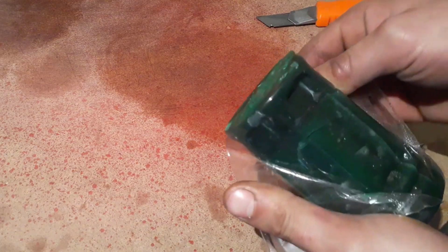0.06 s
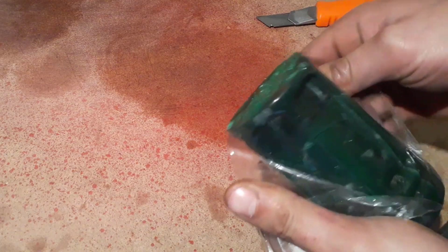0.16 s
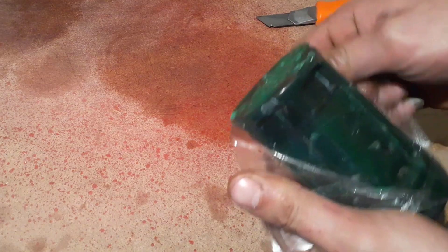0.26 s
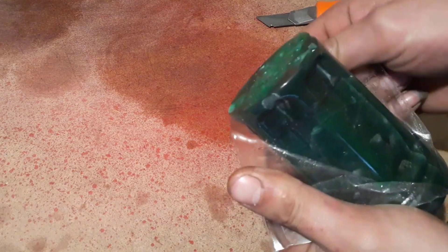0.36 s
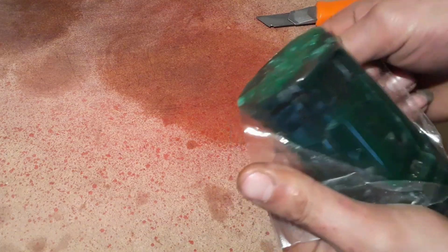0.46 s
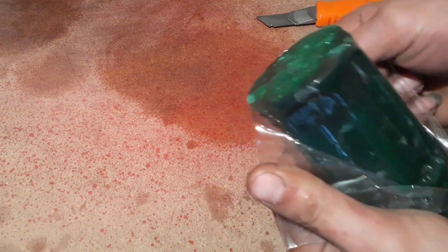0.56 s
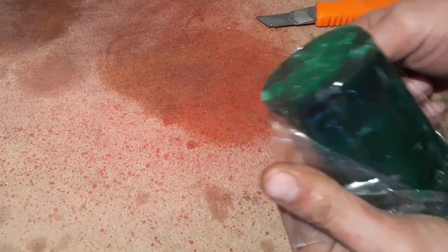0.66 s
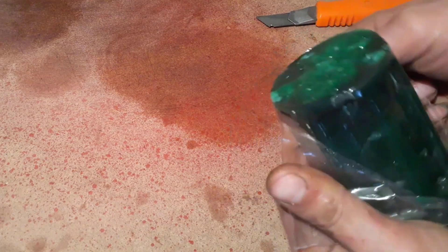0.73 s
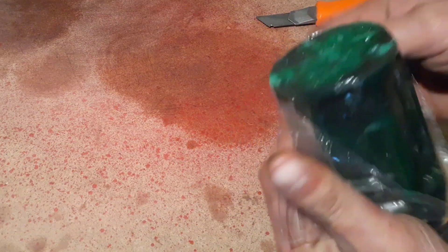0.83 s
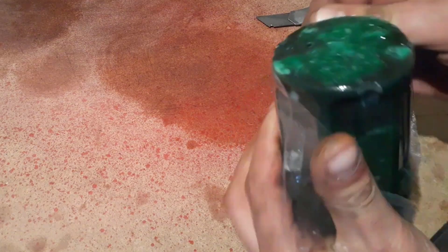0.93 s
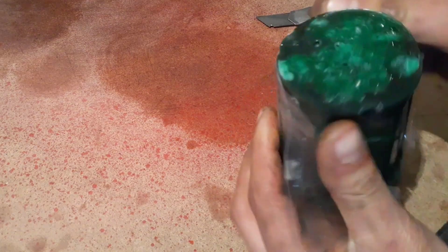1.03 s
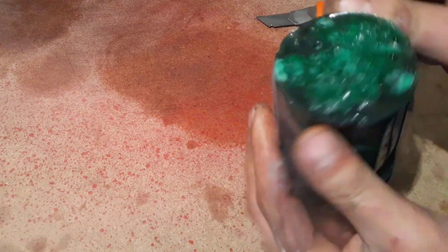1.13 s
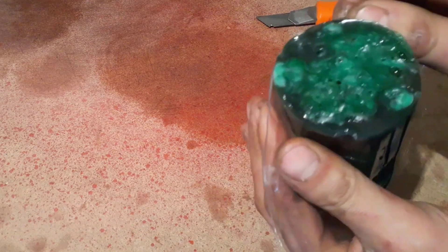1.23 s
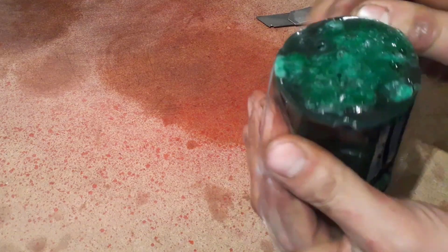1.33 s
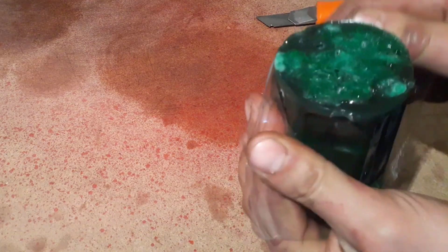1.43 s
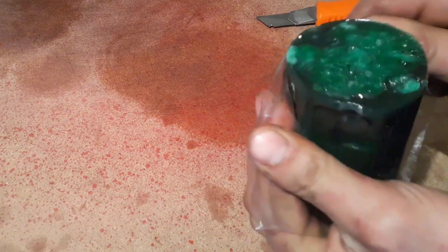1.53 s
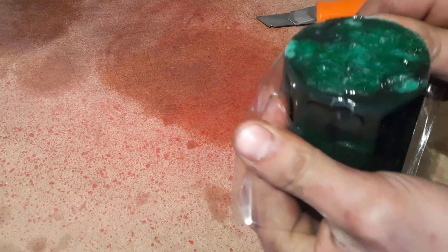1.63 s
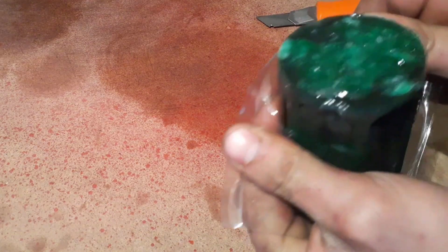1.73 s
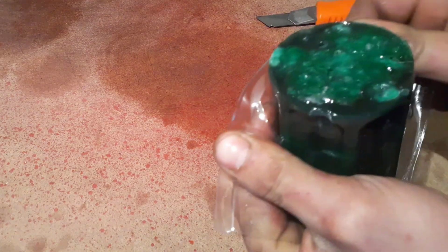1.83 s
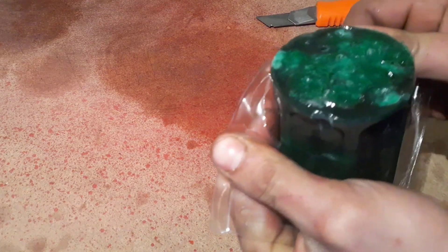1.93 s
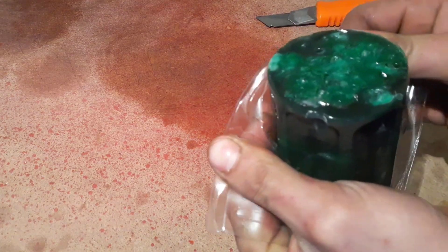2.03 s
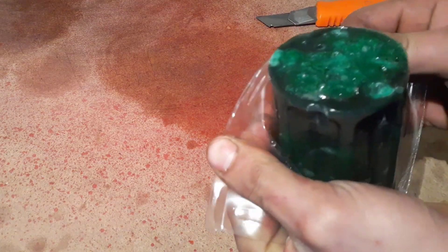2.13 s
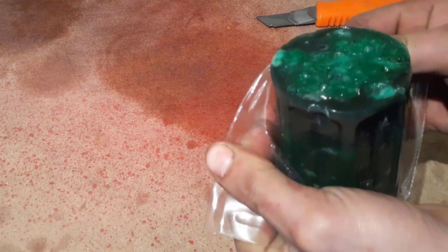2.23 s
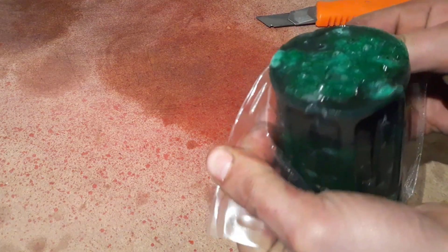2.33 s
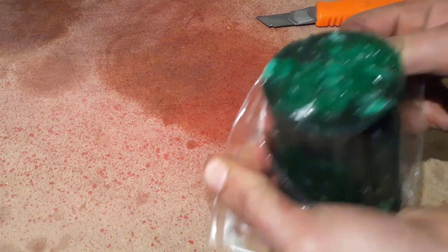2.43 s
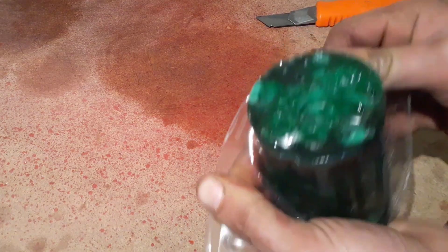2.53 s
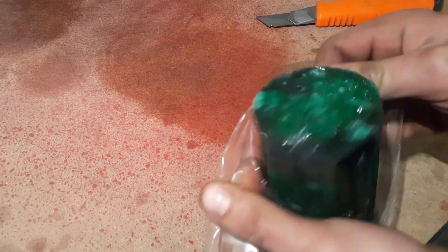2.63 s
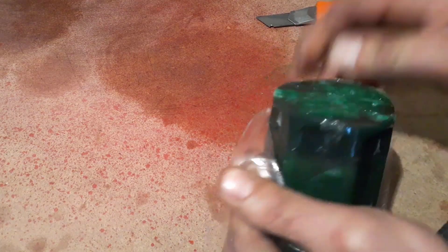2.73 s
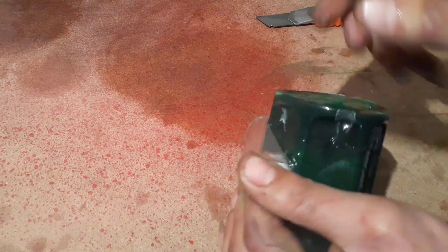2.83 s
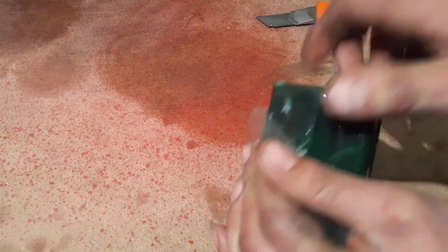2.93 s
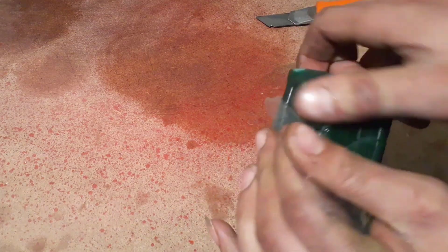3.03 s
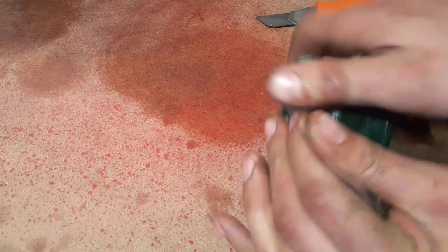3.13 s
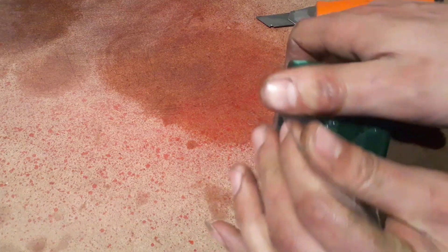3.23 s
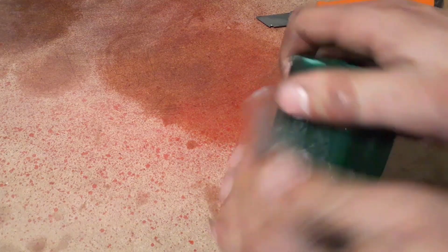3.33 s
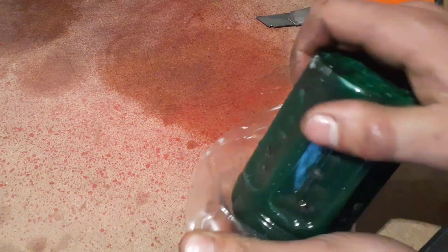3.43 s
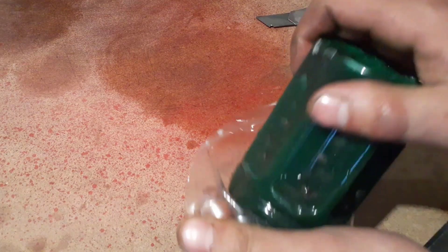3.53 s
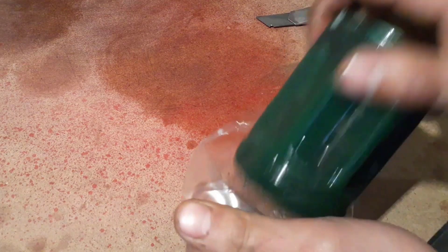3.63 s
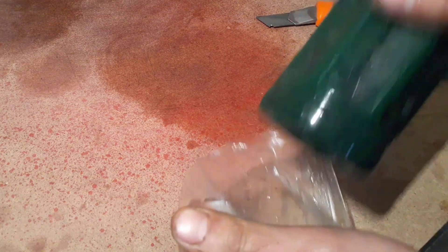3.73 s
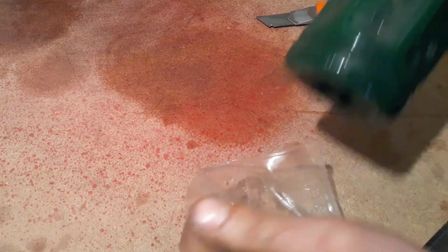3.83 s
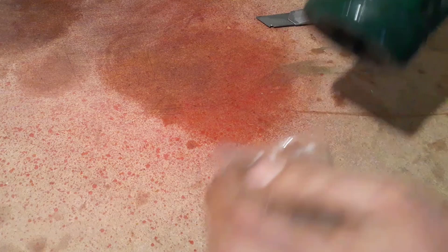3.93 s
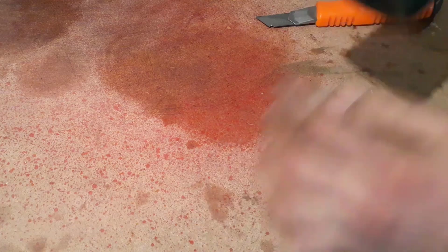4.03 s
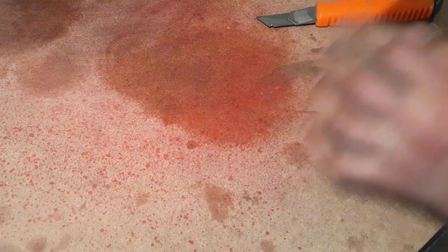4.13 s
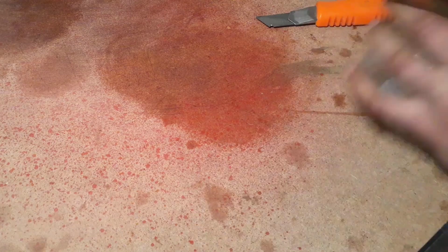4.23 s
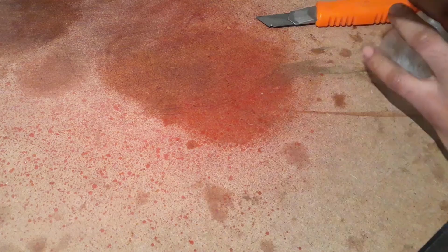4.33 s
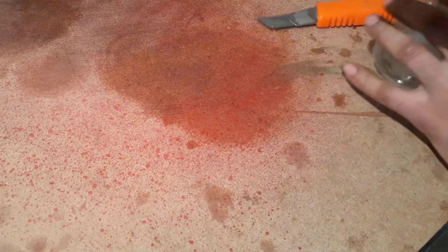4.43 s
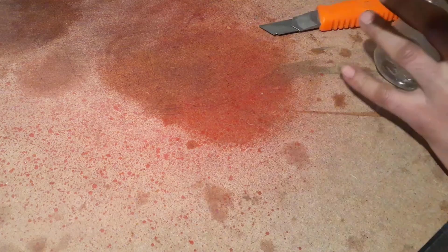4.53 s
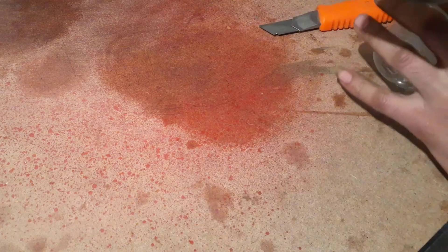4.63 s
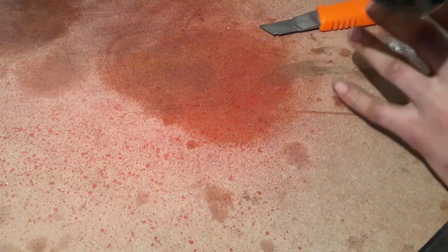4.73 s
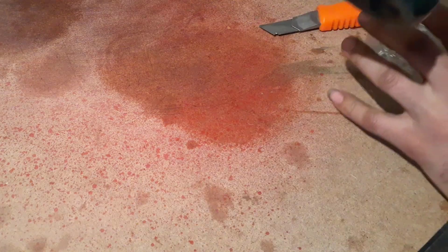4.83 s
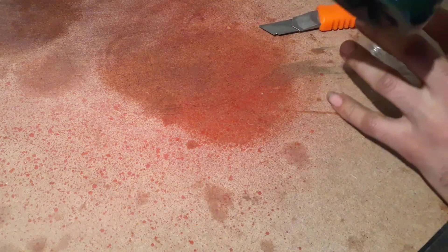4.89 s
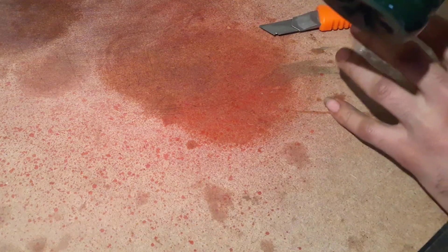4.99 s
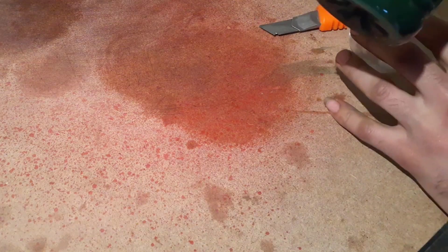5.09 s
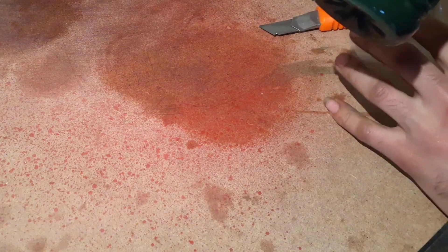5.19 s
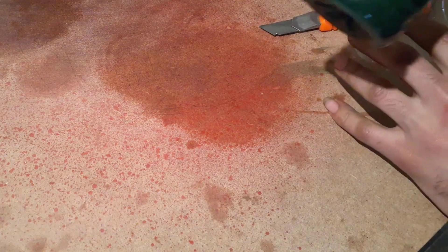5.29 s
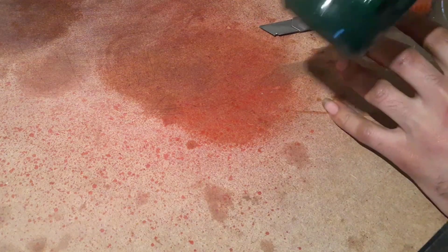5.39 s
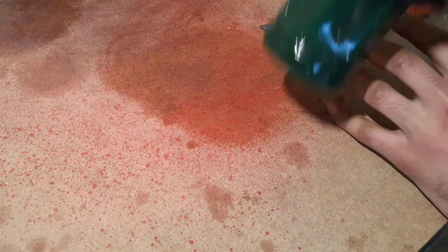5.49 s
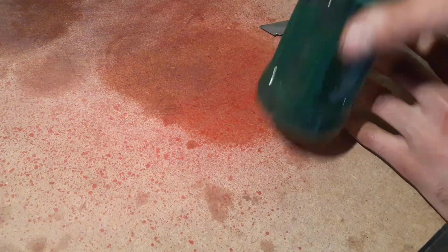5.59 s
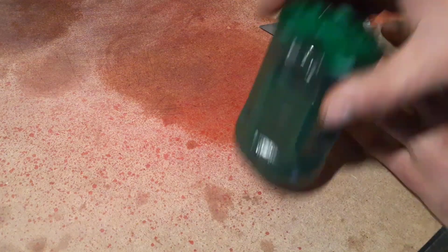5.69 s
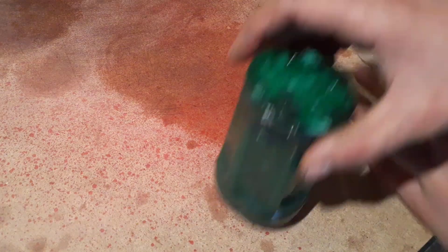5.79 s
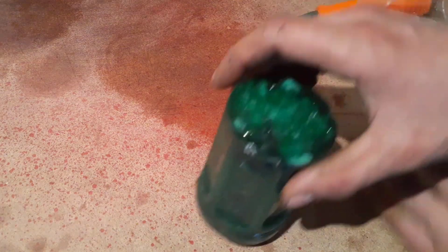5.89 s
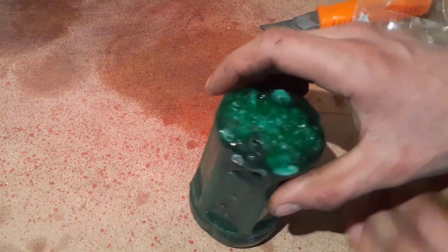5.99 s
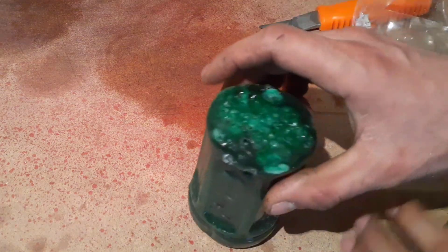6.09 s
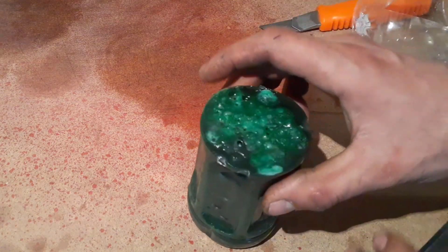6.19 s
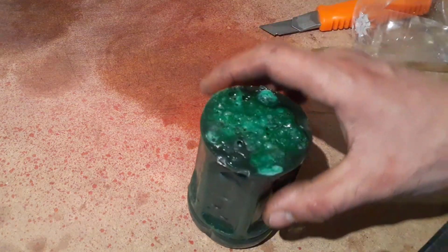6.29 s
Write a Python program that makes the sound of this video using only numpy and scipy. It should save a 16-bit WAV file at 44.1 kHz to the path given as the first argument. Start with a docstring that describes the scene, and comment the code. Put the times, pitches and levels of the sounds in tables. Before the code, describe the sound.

A close stereo microphone at a workshop bench hears faint room hiss and a very low, slowly wavering machine hum. From 0 to 0.6 seconds there are small plastic ticks and light rubbing, with sharper clicks near 0.4. From 0.85 to 1.35, loud brittle snaps burst out, the hardest near 1.2 and slightly overloaded, each ringing briefly in the room. Another big pop comes at 1.63, then softer crinkles, with strong cracks at 1.93, 2.2, 2.44 and 2.7. After a lull, a hard snap at 3.23 starts a dense crackling and rubbing run to about 3.5, trailing into a slide near 3.65. Quiet follows. At 4.4 and 4.57 the light empty shell clacks hollowly onto the bench. A rising scrape with small clicks runs from 5.0 to 5.3, then faint rustling. At 6.0 the heavy block lands with a short, dull thud, followed by barely audible rocking.

```python
"""Faint rubbing and clicks over a low machine hum lead into sharp snaps that ring a workshop room.
Hands peel a thin split plastic mould off a hard cast block: buckling folds are short ragged tones with a noise tick.
Rubbing is dense random slips; the empty mould, dropped and pushed aside, and the block, set down with a thud,
ring as sums of decaying modes. Echoes and noise tails make the room; loud snaps overload the recorder."""
import sys
import numpy as np
from scipy import signal
from scipy.io import wavfile
from scipy.ndimage import uniform_filter1d

SR = 44100
rng = np.random.default_rng(int(sys.argv[2]) if len(sys.argv) > 2 else 0)


def to_wav(s):
    """Save 16-bit WAV."""
    ch = np.atleast_2d(s).T  # columns
    pcm = np.round(np.clip(ch, -1, 1) * 32767)  # PCM
    wavfile.write(sys.argv[1], SR, pcm.astype(np.int16))


N = 280035

# modes of the empty mould: (frequency [Hz], relative level [dB], free decay time t60 [s])
MOULD_MODES = [(435.6, -5, 0.091), (609, 4.5, 0.034), (915, -15.5, 0.043), (927, -15.5, 0.073),
               (1118, 2.5, 0.077), (1253, -14, 0.14), (1650, -3.5, 0.074), (2385, 5.5, 0.027),
               (3493, 1, 0.059)]
FREE_S = 4.3  # from here the mould is off the block


def gain_of(db):
    """Decibels as an amplitude ratio."""
    return 10 ** (np.asarray(db) / 20)


def evened(x):
    """Normalisation to unit root-mean-square."""
    return x / np.sqrt(np.mean(x ** 2) + 1e-20)


def read(points, hz):
    """Interpolation of a spectrum along a logarithmic frequency axis."""
    f, value = np.transpose(points)
    return np.interp(np.log(hz + 1), np.log(f + 1), value)


def follow(points, t):
    """Linear interpolation of a (time, value) curve."""
    return np.interp(t, *np.transpose(points))


def add(mix, s, sound):
    """Superposition of a sound that starts at s seconds."""
    part = mix[:, round(s * SR):][:, :sound.shape[1]]
    part += sound[:, :part.shape[1]]


def placed(x, pan_db, s):
    """Stereo placement by level difference and arrival time: the left channel may lag the right."""
    # where the hands work: (time [s], left lag [samples])
    left_lag = [(0, 7), (3.0, 6), (3.2, 2), (3.7, 0), (4.3, 9), (5.4, 10), (5.9, 15)]
    at = np.arange(len(x))
    lag = np.round(follow(left_lag, s + at / SR)).astype(int)
    late = np.maximum(at - lag, 0)
    left = x * gain_of(pan_db / 2)
    right = x / gain_of(pan_db / 2)
    return np.array([left[late], right])


def ring(t, hz, db, t60):
    """A damped mode: a sine decaying by 60 dB in t60 seconds."""
    return gain_of(db - 60 * t / t60) * np.sin(2 * np.pi * hz * t)


def swing(t, length_s, rise_s=0.00065):
    """Envelope of a transient: a sine-squared onset under a Gaussian decay."""
    onset = np.sin(np.pi / 2 * np.minimum(t / rise_s, 1)) ** 2
    return onset * np.exp(-(t / length_s) ** 2)


def snaps(shares=(.7, .55, .4, .25), tick_share=0.3, looseness=(.8, 1.1, 1.5, 3.6)):
    """Snap-through buckling: four parts of the sheet swing raggedly until the hand and the block stop them."""
    # each fold: (time [s], wide panel [Hz], level [dB], middle panel [Hz], level [dB],
    #             small panel [Hz], level [dB], length scale [s], left minus right [dB])
    snap_table = [(0.1697, 1100, -64, 1480, -45.5, 6150, -35, 0.0087, 1.5),
                  (0.2665, 895, -87.5, 2270, -46, 4440, -50, 0.022, -8),
                  (0.2812, 980, -66, 1950, -43, 5030, -40.5, .011, -21),
                  (0.2939, 980, -65, 1690, -34, 3540, -26.5, 0.01, 1.5),
                  (0.3833, 1500, -69, 2180, -20.5, 5190, -28, 0.0058, -7),
                  (0.4258, 1500, -71, 2050, -32, 6550, -22, 0.0047, -4.5),
                  (0.5062, 1050, -76, 2030, -45.5, 4450, -49, 0.0045, 18),
                  (0.515, 1030, -75.5, 2230, -47.5, 4500, -50.5, .006, -16),
                  (0.8454, 1050, -27.5, 2000, -30, 3440, -37.5, 0.0027, 2.5),
                  (0.9, 860, -10, 2610, -6, 3890, -2, 0.0057, 0),
                  (1.0173, 770, -7.5, 2140, 0, 4364, -2.5, 0.0058, -1.5),
                  (1.2286, 1300, -2, 2210, 6, 3560, 3.5, 0.0021, -4.5),
                  (1.3374, 690, -21.5, 2370, -10, 3530, -4.5, 0.0058, -5),
                  (1.4586, 746, -43, 1560, -34.5, 4500, -31.5, 0.0085, 2.5),
                  (1.4656, 800, -32.5, 2193, -29.5, 3670, -22.5, 0.0018, -15),
                  (1.4916, 720, -42.5, 2780, -45.5, 2900, -36, 0.0091, 3.6),
                  (1.5268, 820, -46.5, 2240, -33.5, 5140, -47.5, 0.0034, -4),
                  (1.5983, 960, -47.5, 2136, -40, 4510, -30, 0.0035, -8),
                  (1.6273, 620, -14, 1691, 4, 5240, -20.5, 0.0074, -1.9),
                  (1.7986, 740, -51, 1670, -48, 6020, -44, 0.015, -11),
                  (1.9116, 1370, -50, 2530, -52, 4560, -46, 0.0071, -11),
                  (1.9186, 900, -41, 2290, -33.5, 5900, -59, 0.01, -4),
                  (1.9301, 820, -17.5, 2100, -13, 3080, -20, 0.0052, -3.5),
                  (2.0586, 1340, -44, 2350, -33.5, 4470, -45.5, 0.0034, 3.5),
                  (2.0894, 855, -50.5, 2270, -46, 4320, -33, 0.0027, -2),
                  (2.144, 900, -59, 2020, -46, 4030, -44.5, 0.0038, -8),
                  (2.181, 720, -36, 1880, -42.5, 4000, -39, 0.008, 5.5),
                  (2.192, 870, -27, 1907, -11, 3364, -11.5, 0.0081, -5),
                  (2.219, 850, -26.5, 1790, -36.5, 3300, -44.5, 0.0055, -2),
                  (2.2473, 1250, -30.5, 2392, -39, 3400, -35, 0.0052, 6),
                  (2.3252, 855, -35, 2120, -43.5, 2900, -35, 0.0048, 1.5),
                  (2.3315, 590, -21, 1065, -16.5, 2750, -15.5, 0.0072, -3),
                  (2.44, 1100, -12, 1740, 0, 5700, -18.5, 0.0044, -5.5),
                  (2.628, 1340, -60.5, 1640, -53, 5130, -50, 0.0068, -2.5),
                  (2.685, 920, -44.5, 1834, -41, 3200, -34, 0.0099, -9.5),
                  (2.7042, 800, -7, 2500, -3, 4180, -11.5, 0.0051, -2.5),
                  (2.867, 910, -68.5, 2080, -58, 5500, -48, 0.0022, -8),
                  (2.9485, 910, -56.5, 2080, -47, 4000, -40.5, 0.0066, -4.5),
                  (3.008, 1420, -67.5, 2490, -60, 6340, -39, 0.0037, -2.5),
                  (3.0353, 1410, -62, 2152, -51, 6490, -41.5, 0.0059, -7),
                  (3.179, 1030, -48.5, 1530, -37.5, 4800, -51, 0.0091, -9),
                  (3.2073, 1010, -40.5, 2245, -27, 4030, -19.5, 0.0069, -2),
                  (3.2273, 1170, -37.5, 2375, 0, 3570, 3, 0.0056, -6),
                  (3.3745, 1290, -14, 2221, -19.5, 3100, -22.5, 0.01, 6.5),
                  (3.3839, 1340, -18, 2000, -21.5, 6300, -27, .0061, 0),
                  (3.42, 1400, -17, 2460, -33.5, 5400, -25, 0.0024, -0.9),
                  (3.4405, 1020, -22, 1503, -15.5, 4070, -18.5, 0.0093, -1.5),
                  (3.444, 1084, -17, 1579, -20, 4040, -12, 0.0082, -2),
                  (3.455, 1225, -9.5, 2210, -12, 3600, -18, 0.0081, 7),
                  (3.4923, 1028, -4, 2390, -13.5, 3840, -1, 0.0081, 2.5),
                  (3.501, 919, -16, 2054, -19.5, 3600, -22, 0.011, -2.1),
                  (3.641, 890, -32.5, 1710, -51, 3610, -37, .012, -8.5),
                  (3.6587, 880, -27.5, 1513, -32, 5800, -27.5, 0.014, 0.5),
                  (4.3808, 1045, -21, 2584, -26, 3680, -22, 0.025, -6.5),
                  (4.3925, 1021, -14.5, 1613, -22.5, 2910, -16, 0.0077, -23),
                  (4.402, 1200, -2, 1630, -15.5, 3450, -9, 0.0054, 0.5),
                  (4.5, 903, -20, 1627, -21.5, 3500, -17, 0.0051, 1.5),
                  (4.5729, 908, -6, 1692, -2, 3016, -9.5, 0.01, -1.5),
                  (4.581, 1230, -15, 1657, -11.5, 3310, -50.5, 0.0076, -8.5),
                  (4.8693, 940, -75, 2490, -75, 6640, -49.5, 0.0039, 16),
                  (5.2081, 880, -50, 2760, -40, 3480, -46, 0.0022, 16),
                  (5.231, 1420, -25, 2140, -36, 5900, -27.5, 0.0039, -6),
                  (5.2633, 1045, -35, 2184, -32, 3020, -32.5, 0.025, 12.5),
                  (5.3044, 903, -31.5, 1630, -28, 3000, -33, 0.017, -9)]
    wall_hz, wall_db = 545.5, -19  # the whole wall moves with the wide panel, this much weaker
    # edge tick against the small panel when that is at 4 kHz; tighter folds tick harder
    tick_base_db, tick_db_per_octave = -8, 13.5
    free_tick_db = -10  # off the block, the mould ticks more softly
    ragged = 0.34  # phase wander [rad] for a looseness of 1
    bass_cut_hz = 340
    out, t = np.zeros((2, N)), np.arange(1024) / SR
    chance = rng.standard_normal((len(snap_table), 5, len(t)))
    for (s, *panels, length, pan_db), noise in zip(snap_table, chance):
        small_hz, small_db = panels[-2:]
        tick_db = small_db + tick_base_db + tick_db_per_octave * np.log2(small_hz / 4000)
        tick_db += free_tick_db * (s > FREE_S)
        tick = evened(noise[0] + 0.4 * np.roll(noise[0], 1) - 0.5 * np.roll(noise[0], 2))
        body = gain_of(tick_db) * tick * swing(t, length * tick_share) / 2
        panels = [wall_hz, panels[1] + wall_db, *panels]
        for hz, db, share, loose, u in zip(panels[::2], panels[1::2], shares, looseness, noise[1:]):
            # the fold travels, so the pitch is unsteady
            wobble = evened(np.convolve(u, np.hanning(round(2 * SR / hz)), "same"))
            tone = np.sin(2 * np.pi * hz * t + loose * ragged * wobble)
            body += gain_of(db) * swing(t, length * share) * tone
        add(out, s, placed(body, pan_db, s))
    bass_cut = signal.butter(3, bass_cut_hz, "high", fs=SR, output="sos")
    return signal.sosfilt(bass_cut, out)


def handling(t):
    """Power summation of slides and grip: gives level, brightness and side, led by the loudest."""
    # slides of fingers and plastic: (start [s], rise [s], hold [s], fall [s], level [dB],
    #                                 brightness [dB per octave], left minus right [dB])
    slide_table = [(0, .001, .001, 0.12, -54.5, -7, 0), (0.137, .025, 0.057, 0.06, -58, 5.5, -10.5),
                   (0.229, .07, 0.00038, .09, -42.5, 5.5, -9), (.76, 0.077, .05, .05, -56.5, 1.5, -9),
                   (.895, 0.011, .03, .25, -44, 0.5, -5.5), (1.012, 0.0065, .03, 0.18, -41, 2.5, 0),
                   (2.123, .12, .001, 0.083, -47, -6, -3), (3.1, 0.093, .03, .05, -55.5, 0.5, -3),
                   (3.222, 0.011, 0.045, 0.16, -34.5, 1, 1), (3.333, .04, 0.068, 0.19, -33, -2.5, -4),
                   (3.619, .04, 0.0014, 0.064, -34.5, -1.5, 1.5),
                   (4.374, .015, 0.13, 0.072, -42.5, -1, -3.5), (4.503, .11, .001, 0.15, -43, -6.5, -3.5),
                   (4.893, .045, 0.053, .1, -56, -1, -4), (4.987, .32, 0.00083, 0.038, -39, -2, -3.5),
                   (5.648, 0.24, .15, 0.37, -55, 0, -11)]
    # the grip shifting on the sheet between slides: (time [s], level [dB])
    grip_table = [(0, -77), (.4, -73), (.6, -82.5), (.8, -88), (1.3, -69.5), (1.7, -59.5), (2.4, -79.5),
                  (2.93, -73.5), (3.02, -69.5), (3.55, -53.5), (3.8, -76.5), (4.35, -73.5), (4.85, -83.5),
                  (5.6, -100), (6.35, -73)]
    grip_tilt_db, grip_pan_db = 3, -12  # dB per octave, left minus right dB
    edge_db = 30  # drop over one rise or fall time; the slope continues beyond it
    start, rise, hold, fall, level_db, tilt_db, pan_db = np.transpose(slide_table)[:, :, None]
    before = (start + rise - t) / np.maximum(rise, .001)
    after = (t - start - rise - hold) / np.maximum(fall, .001)
    away = np.maximum(np.maximum(before, after), 0)
    slides = gain_of(level_db - edge_db * away) ** 2
    grip = gain_of(follow(grip_table, t)) ** 2
    power = slides.sum(0) + grip
    tilt = ((slides * tilt_db).sum(0) + grip * grip_tilt_db) / power
    pan = ((slides * pan_db).sum(0) + grip * grip_pan_db) / power
    return np.sqrt(power), tilt, pan


def rubbing(grains_per_s=2500, spread_db=3.5, smooth=0.39):
    """Friction as dense random micro-slips over a hiss, with a spectral tilt that follows the grip."""
    # spectrum of the rub: (frequency [Hz], relative spectral density [dB])
    rub_colour = [(90, -41.5), (200, -8), (430, -10), (800, -7.5), (1200, -2), (2400, -5), (3200, -5),
                  (6500, -11.5), (12400, -23), (16000, -48.5)]
    sizes = gain_of(spread_db * np.minimum(rng.exponential(1, N), 5))
    slips = sizes * (rng.random(N) < grains_per_s / SR) * rng.choice([-1., 1.], N)
    x = evened(slips) + smooth * rng.standard_normal(N)
    hz, t, z = signal.stft(x, SR, nperseg=512, noverlap=384)
    hz_column = hz[:, None]
    tilt_db = np.log2((hz_column + 50) / 2000) * handling(t)[1]
    colour = gain_of(read(rub_colour, hz)[:, None] + tilt_db)
    # equal power from 600 Hz to 9 kHz, so that tilt leaves the level there alone
    band = (hz > 600) & (hz < 9000)
    colour /= np.sqrt((colour[band] ** 2).sum(0) / len(hz))
    x = signal.istft(z * colour, SR, nperseg=512, noverlap=384)[1][:N]
    level, _, pan_db = handling(np.arange(N) / SR)
    return placed(x * level, pan_db, 0)


def rubbed_mould(rub, damping=0.43):
    """Forced resonance: slips ring the empty mould as it is pushed along the bench, damped by the hand."""
    put_aside_s, ring_db = 5.5, -7
    t, now = np.arange(4096) / SR, np.arange(N) / SR
    body = sum((-1) ** k * ring(t, hz, db, damping * t60) for k, (hz, db, t60) in enumerate(MOULD_MODES))
    body /= np.linalg.norm(body)
    held = rub * (now > FREE_S) * (now < put_aside_s)
    return gain_of(ring_db) * signal.oaconvolve(held, body[None], axes=1)[:, :N]


def knocks(modes, blows, push_s, pan_db):
    """Modal impact response: each blunt push, a pulse of time constant push_s, rings the same modes."""
    out, t = np.zeros((2, N)), np.arange(SR // 2) / SR
    body = sum((-1) ** k * ring(t, *mode) for k, mode in enumerate(modes))
    push = t[:300] * np.exp(-t[:300] / push_s)
    body = np.convolve(body, push)
    body /= np.abs(body).max()
    for s, db in blows:
        add(out, s, placed(gain_of(db) * body, pan_db, s))
    return out


def mould_drops():
    """Impact of a light shell: very short pushes excite the modes of the empty mould."""
    # the mould lands on the bench and is pressed down: (time [s], level [dB])
    drop_table = [(4.391, -8.5), (4.403, -10), (4.573, -1), (4.582, -27)]
    return knocks(MOULD_MODES, drop_table, push_s=.00006, pan_db=1.5)


def block_thuds():
    """Impact of a heavy body: longer pushes favour the low modes of the bench."""
    # modes of the bench: (frequency [Hz], relative level [dB], decay time t60 [s])
    bench_modes = [(131.6, -8.5, 0.54), (176.5, -2, 0.23), (203, -7, 0.64), (230.7, 2, 0.19),
                   (269, 1.5, 0.17), (357, 7.5, 0.081), (499, 6.5, 0.036), (821, 4, 0.055), (946, 2, 0.047),
                   (1270, 11, 0.024)]
    # the block meets the bench and rocks: (time [s], level [dB])
    thud_table = [(6.009, -19), (6.188, -47), (6.22, -43)]
    return knocks(bench_modes, thud_table, push_s=0.0003, pan_db=-0.5)


def workshop(x, tail_db=-11.5):
    """Room reverberation: early echoes, then random taps whose exponential decay differs by band."""
    # direct sound against the room, as the hands move off: (time [s], level [dB])
    nearness = [(4.2, -0.5), (4.3, -3), (5.5, -2), (5.7, -3)]
    # bench and walls: (left delay [s], left level [dB], right delay [s], right level [dB])
    echo_table = [(.0012, -12, .0016, -10), (.0066, -14, .0058, -13), (.0102, -15, .0091, -15)]
    # reverberation: (frequency [Hz], decay time t60 [s])
    room_decay = [(150, 1), (500, 0.39), (1400, 0.34), (3500, 0.33), (7000, 0.22), (12000, 0.088)]
    # spectrum of the tail: (frequency [Hz], relative level [dB])
    room_colour = [(150, -6), (500, 3.5), (1400, 1), (3500, 1), (7000, -2), (12000, 3.5)]
    t = np.arange(N) / SR
    near = x * gain_of(follow(nearness, t))
    out = near.copy()
    for echo in echo_table:
        for side in range(2):
            delay_s, db = echo[2 * side:2 * side + 2]
            out[side] += gain_of(db) * np.roll(near[side], round(delay_s * SR))
    turn = t * np.pi / 0.702
    for k in range(3):  # three tails take turns
        taps = np.zeros((2, SR // 2))
        jitter = rng.integers(0, 20, (2, (SR // 2 - 241) // 20))
        at = np.arange(240, SR // 2 - 20, 20) + jitter  # one tap in every 20 samples
        np.put_along_axis(taps, at, rng.choice([-1., 1.], at.shape), 1)
        hz, age, z = signal.stft(taps, SR, nperseg=256)
        z *= gain_of(read(room_colour, hz)[:, None] - 60 * age / read(room_decay, hz)[:, None])
        tail = signal.istft(z, SR, nperseg=256)[1]
        tail /= np.linalg.norm(tail[0])
        feed = x * np.sqrt(2 / 3) * np.cos(turn + k * np.pi / 3)
        out += gain_of(tail_db) * signal.fftconvolve(feed, tail, axes=1)[:, :N]
    return out


def hum(waver_hz=0.94):
    """Frequency modulation: three low machine tones waver slowly in pitch."""
    # level of the tones: (time [s], upper tone [dB], lower tone [dB])
    hum_levels = [(0.0, -53, -60), (0.56, -54, -63), (1.11, -45, -54.5), (1.57, -47.5, -53.5),
                  (1.75, -56.5, -64.5), (2.01, -45, -58), (2.35, -41, -55.5), (2.65, -55.5, -57),
                  (2.74, -49, -52.5), (3.18, -45.5, -59.5), (3.52, -63, -61), (3.77, -60.5, -62.5),
                  (4.3, -78, -71), (4.49, -53.5, -54.5), (4.88, -53, -64.5), (4.99, -63, -59),
                  (5.32, -51.5, -54.5), (5.5, -54, -62.5), (5.89, -54, -56.5), (6.1, -51, -56.5),
                  (6.35, -54, -65)]
    # the upper, lower and third tone: (frequency [Hz])
    hum_tones = (75, 52, 99.5)
    third_tone_db = -74
    t = np.arange(N) / SR
    s, upper_db, lower_db = np.transpose(hum_levels)
    levels_db = (np.interp(t, s, upper_db), np.interp(t, s, lower_db), third_tone_db)
    out = 0
    for hz, db in zip(hum_tones, levels_db):
        drift = 0
        for f in np.geomspace(.3, 4, 12):  # waver rates in Hz
            drift = drift + np.sin(2 * np.pi * (f * t + rng.random())) / np.sqrt(f)
        cycles = np.cumsum(hz + waver_hz * evened(drift)) / SR + rng.random()
        out = out + np.sqrt(2) * gain_of(db) * np.sin(2 * np.pi * cycles)
    return out * gain_of([[.3], [-.3]])  # left, right


def air():
    """Partly correlated stereo noise: room air and microphone hiss, steady but slightly patchy."""
    # spectrum of the air: (frequency [Hz], relative spectral density [dB])
    air_colour = [(20, -26), (40, -10), (100, 3), (130, -12.5), (200, -3.5), (300, -15.5), (600, -23),
                  (1500, -28.5), (4000, -34), (8000, -38.5), (13000, -31.5), (15000, -34), (16500, -50.5)]
    # coherence of the channels: (frequency [Hz], left-right correlation [ratio])
    air_same = [(100, 0.75), (400, 0.2), (2000, 0.26), (10000, 0.15)]
    air_db, patch_db = -62.5, 0.56
    frames, hz = N // 256 + 5, np.fft.rfftfreq(1024, 1 / SR)
    a, b, c, d, patches = rng.standard_normal((frames, 513, 5)).T
    patches = uniform_filter1d(patches, 12, 0)  # across frequency
    patches = evened(uniform_filter1d(patches, 20, 1))  # across time
    same = np.clip(read(air_same, hz), -1, 1)[:, None]
    left, other = a + 1j * b, c + 1j * d
    right = same * left + np.sqrt(1 - same ** 2) * other
    z = np.array([left, right]) * gain_of(read(air_colour, hz)[:, None] + patch_db * patches)
    noise = signal.istft(z, nperseg=1024, noverlap=768)[1][:, :N]
    return gain_of(air_db) * evened(noise)


def scene():
    """Superposition: the handled objects sound in the room, over hum and air."""
    rub = rubbing()
    hits = block_thuds() + mould_drops()
    return workshop(snaps() + rub + rubbed_mould(rub) + hits) + hum() + air()


def record(dry):
    """Saturation: the loudest snaps bend sharply towards a ceiling; a low-pass filter then limits the band."""
    ceiling, edge_hz = .7, 16500
    clipped = dry / (1 + np.abs(dry / ceiling) ** 8) ** (1 / 8)
    low_pass = signal.firwin(511, edge_hz, window=("kaiser", 9), fs=SR)
    return signal.oaconvolve(clipped, low_pass[None], "same")


dry = scene()
out = record(dry)
to_wav(out)
```